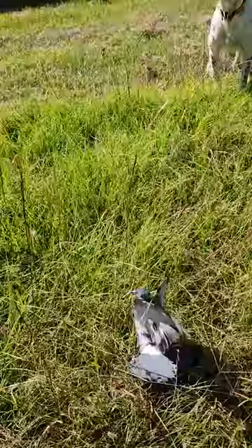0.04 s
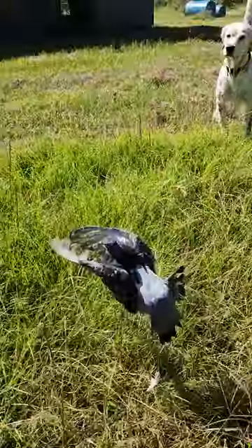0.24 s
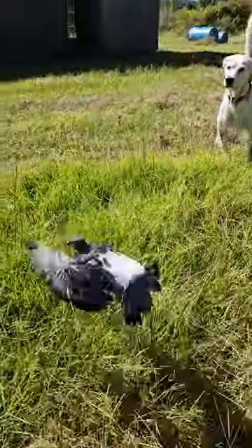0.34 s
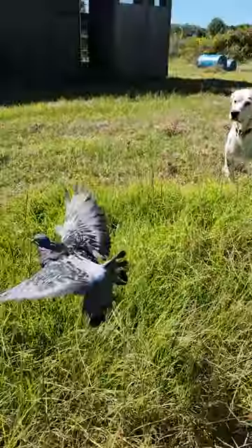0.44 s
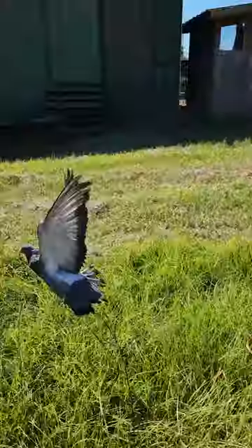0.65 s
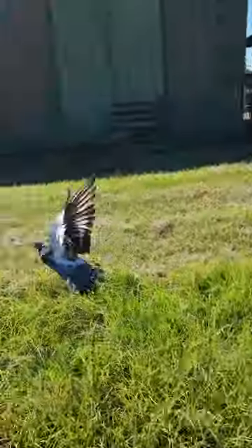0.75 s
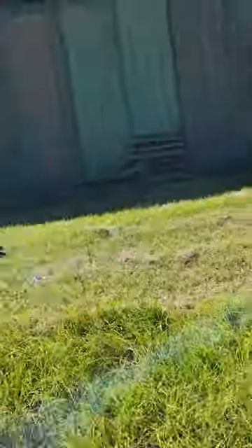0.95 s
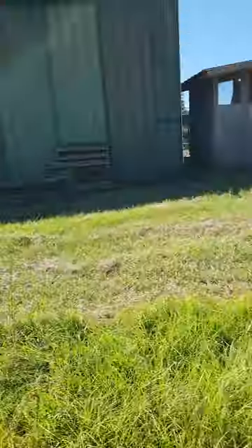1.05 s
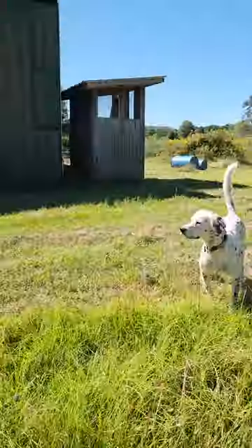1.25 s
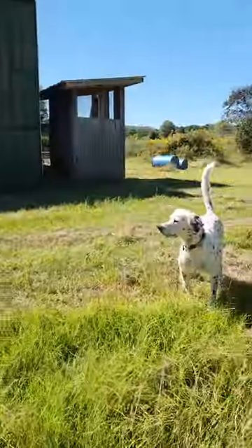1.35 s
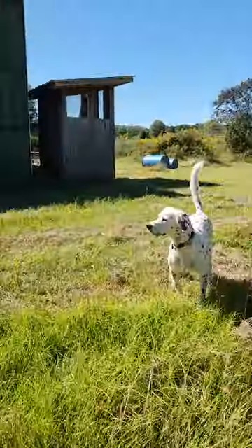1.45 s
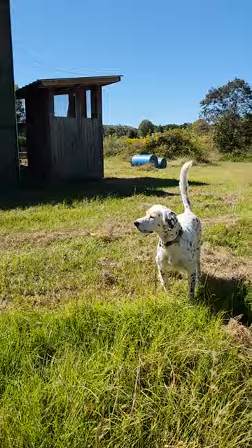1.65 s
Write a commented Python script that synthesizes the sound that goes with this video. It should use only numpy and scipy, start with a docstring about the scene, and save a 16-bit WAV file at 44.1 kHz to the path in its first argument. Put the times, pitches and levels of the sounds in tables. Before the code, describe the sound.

Fast bird wings clap and flap up from rustling grass, fading across an open field.

```python
"""A pigeon bursts out of long grass in an open field and flies off, about nine wingbeats a second.
Its wings thrash the stalks, then clap together at the top of each stroke. The feathers swish and
whistle through the air, and every beat pushes a soft puff of it. The claps die away first, leaving
mostly puffs. Behind the bird are crickets, a briefly ticking bush-cricket and a light breeze."""
import sys
import numpy as np
from scipy import signal
from scipy.fft import rfft, irfft
from scipy.io import wavfile
from scipy.ndimage import uniform_filter1d

SR = 44100
rng = np.random.default_rng(int(sys.argv[2]) if len(sys.argv) > 2 else 0)


def pcm_store(signal):
    """Save signal as 16-bit PCM."""
    levels = np.round(np.clip(np.atleast_2d(signal), -1, 1) * 32767)
    wavfile.write(sys.argv[1], SR, levels.astype(np.int16).T)


N = 74970
TIME = np.arange(N) / SR
FREQS = np.maximum(np.fft.rfftfreq(N, 1 / SR), 1)

# The wingbeats. Each row: time in seconds, puff level in dB, puff width in ms, then the levels in dB of
# the rebound, the upstroke whoosh, the swish and the whistle, and last the pan (left minus right) in dB.
WINGBEATS = [(.3275, -36, 1.9, -49, -38, -54, -37.5, 3.5), (.4600, -19.5, 2.7, -57, -33.5, -33.5, -40, 0),
             (.5730, -28.5, 1.7, -57, -38.5, -40, -42.5, -1.5),
             (0.6866, -26, 3.4, -41, -44, -40, -44.5, 0.5), (0.803, -18, 1.68, -55, -48, -41.5, -45, 1),
             (.9180, -21.5, 2.2, -46, -40.5, -43, -40.5, 1.5), (1.0345, -22, 3, -41, -48.5, -46, -46.5, 2),
             (1.148, -23, 4.1, -40, -46.5, -45, -46.5, 3.5), (1.261, -23, 4, -26, -49.5, -45, -52, 2.5),
             (1.3760, -24, 3.96, -31.5, -51, -50.5, -54, 3),
             (1.4850, -27.5, 3.46, -31.5, -54.5, -53.5, -61, 2.5),
             (1.5915, -28, 3.7, -35, -57, -54, -60, 3.5), (1.6980, -30, 4, -41, -60.5, -59, -60, 3)]
# How alike left and right are for close sounds. Each row: frequency in Hz, likeness (1 is identical).
NEAR_LIKENESS = [(60, 0.9), (300, .96), (700, 0.28), (1500, 0.23), (3000, 0.4), (5500, 0.1), (10000, 0.017)]


def from_db(db):
    """Turn decibels into a gain to multiply by."""
    return 10 ** (np.asarray(db) / 20)


def rms_one(x):
    """Scale a signal so that its average power is 1."""
    return x / np.sqrt(np.mean(x ** 2) + 1e-20)


def by_hz(points):
    """Join (Hz, value) points into a curve over all frequencies, giving each octave equal room."""
    hz, value = np.transpose(points)
    return np.interp(np.log(FREQS), np.log(hz), value)


def level(points):
    """Join (seconds, dB) points into a gain that changes over time."""
    return from_db(np.interp(TIME, *np.transpose(points)))


def bell(x, width):
    """A smooth hump of height 1, centred where x is zero."""
    return np.exp(-.5 * (x / width) ** 2)


def band(hz, octaves):
    """A smooth hump over the frequencies around one pitch."""
    return bell(np.log2(FREQS / hz), octaves)


def panned(db):
    """Left and right gains, with the left louder by this many dB."""
    return from_db(np.array([[db], [-db]]) / 2)


def noise(gain, likeness=NEAR_LIKENESS):
    """Stereo noise with a gain for each frequency and a chosen likeness of left and right."""
    alike = np.clip(by_hz(likeness), -1, 1)
    mid, side = rfft(rng.standard_normal((2, N)))
    spectrum = np.sqrt(1 + alike) * mid + np.sqrt(1 - alike) * side * [[1], [-1]]
    return rms_one(irfft(gain * spectrum, N))


def coloured(colour, likeness=NEAR_LIKENESS):
    """Stereo noise whose colour (its mix of low and high) follows (Hz, dB) points."""
    return noise(from_db(by_hz(colour)), likeness)


def drift(rate_hz):
    """A random wobble of typical size 1; a higher rate makes it quicker."""
    return rms_one(irfft(rfft(rng.standard_normal(N)) * bell(FREQS, rate_hz), N))


def burst(ms, hold_ms, release_ms):
    """A loudness shape that jumps up, holds, then dies away."""
    attack = bell(np.minimum(ms, 0), width=.2)
    return attack * np.exp(-np.maximum(ms - hold_ms, 0) / release_ms)


def steadied(x, envelope):
    """Give noise a loudness shape (an envelope), so that its total energy is not left to chance."""
    energy = np.sum(np.mean(x ** 2, axis=0) * envelope ** 2)
    return x * envelope * np.sqrt(np.sum(envelope ** 2) / (energy + 1e-20))


def evened(x, gain):
    """Smooth out the chance peaks in a burst's spectrum and colour it, keeping its energy."""
    spectrum = rfft(x)
    power = np.mean(np.abs(spectrum) ** 2, axis=0)
    outline = np.sqrt(np.abs(uniform_filter1d(power, size=900)) + 1e-12)
    return rms_one(irfft(spectrum / outline * gain, N)) * np.sqrt(np.mean(x ** 2))


def breathy(hz, envelope, spread_hz):
    """An airy tone: a narrow band of noise around a moving pitch."""
    phase = 2 * np.pi * np.cumsum(hz) / SR
    tone = drift(spread_hz) * np.sin(phase) + drift(spread_hz) * np.cos(phase)
    return steadied(tone[None], envelope)


def breeze_and_insects():
    """A distant hiss of breeze, a thin chorus of crickets and one bush-cricket ticking at the start."""
    # The colour of the open field. Each row: frequency in Hz, level in dB.
    field_colour = [(100, 4), (250, -30.5), (450, -4.5), (620, 6.5), (900, -1), (1200, -6.5), (1600, -4),
                    (3000, -6.5), (6000, -26), (8000, -54), (10000, -23), (15500, -4.5)]
    # How alike left and right are for far sounds. Each row: frequency in Hz, likeness (1 is identical).
    far_likeness = [(100, 0.47), (500, 0.57), (1500, 0.067), (8000, 0.04)]
    hiss = coloured(field_colour, far_likeness)
    chorus = noise(band(hz=7800, octaves=0.09), far_likeness)
    rasp = noise(band(hz=13700, octaves=0.13), far_likeness)
    tick_times = np.arange(0.0093, .145, step=0.016)
    ticks = sum(bell(TIME - at, width=0.00078) for at in tick_times)
    return from_db(-53.5) * hiss + from_db(-57.5) * chorus + from_db(-48) * ticks * rasp


def downwash():
    """Air pushed down by the wings buffets the microphone and swirls while the bird is close."""
    # The strength of the buffeting. Each row: time in seconds, level in dB.
    buffet_levels = [(0, -57), (.17, -48.5), (.25, -44.5), (.42, -35.5), (.55, -39), (.66, -43.5),
                     (.8, -43), (1.2, -45), (1.7, -53.5)]
    # The deep rumble of the buffeting. Each row: frequency in Hz, level in dB.
    buffet_colour = [(18, 0), (40, 4), (80, 0.5), (150, -15.5), (300, -33.5), (600, -47), (2000, -80)]
    # The low rush of swirling air. Each row: frequency in Hz, level in dB.
    swirl_colour = [(90, -3.5), (170, -5), (330, -3.5), (500, -16), (900, -20), (3000, -59)]
    closeness = bell(TIME - 0.56, width=0.17)
    swirls = from_db(-41.5) * closeness * coloured(swirl_colour)
    return level(buffet_levels) * coloured(buffet_colour) + swirls


def thrashed_grass():
    """Wings and feet beat the grass into many tiny crackles, which settle once the bird is clear."""
    # How hard the grass is thrashed. Each row: time in seconds, level in dB.
    thrash_levels = [(0, -62.5), (.14, -58.5), (.17, -42.5), (.192, -46), (.222, -33), (.242, -26),
                     (.258, -22), (.272, -35), (.292, -46), (.312, -37.5), (.348, -48), (.366, -35),
                     (.377, -24), (.40, -31.5), (.437, -43), (.47, -43.5), (.54, -46.5), (.68, -51)]
    # The colour of rustling grass. Each row: frequency in Hz, level in dB.
    grass_colour = [(100, -18.5), (330, 5.5), (480, -4), (700, -0.5), (1500, -7), (2600, -11), (5000, -7.5),
                    (7500, -6.5), (10000, -10.5), (15000, -17.5)]
    grains_per_s, grain_s, steady_hiss = 700, 0.00067, .5
    clear_at_s, settle_db_per_s = 0.95, 60
    sizes = from_db(3 * np.minimum(rng.exponential(1, N), 3))
    grains = sizes * (rng.random(N) < grains_per_s / SR)
    decay = np.exp(-1 / (grain_s * SR))
    fading_grains = signal.lfilter([1], [1, -decay], grains)
    crackle = rms_one(steady_hiss + rms_one(fading_grains))
    settling = from_db(-settle_db_per_s * np.maximum(TIME - clear_at_s, 0))
    return level(thrash_levels) * settling * crackle * coloured(grass_colour)


def snapping_stalks():
    """Single stalks snap or are slapped, each with a very short burst of noise."""
    # The snaps. Each row: start in seconds, level in dB, pan (left minus right) in dB.
    snaps = [(0.1985, -21, 1), (0.2134, -17.5, -5), (0.233, -15.5, 2.5), (0.302, -36, 0), (.3110, -37, -4),
             (.3575, -21.5, 3), (0.3717, -21, 6.5), (0.3889, -17, 0.5), (0.4742, -30, 8),
             (0.6407, -21.5, -2), (0.7397, -25.5, 1.5)]
    # The colour of a snapping stalk. Each row: frequency in Hz, level in dB.
    snap_colour = [(150, -3), (700, -1.5), (1400, 4), (2600, -2.5), (5000, -3), (8000, -3.5), (10000, -9.5),
                   (15000, -11)]
    stalk = coloured(snap_colour)
    out = np.zeros((2, N))
    for start, db, pan_db in snaps:
        envelope = burst((TIME - start) * 1000, hold_ms=0, release_ms=1.7)
        out += from_db(db) * panned(pan_db) * steadied(stalk, envelope)
    return out


def feathers_in_air():
    """Feathers cut the air with a fluttering swish, a low whoosh going up and a whistle coming down."""
    # The colour of the swish. Each row: frequency in Hz, level in dB.
    swish_colour = [(150, 2.5), (350, -3), (600, -1), (1000, -2), (1500, 0), (2200, -7.5), (4500, -8.5),
                    (8000, -13.5), (10000, -22), (15000, -18.5)]
    upstroke_lead_s, fastest_at_s = .02, .038  # before and after the top of the stroke
    rise_hz_per_s, sag_hz_per_s = 160, 3300  # the whoosh is higher with each beat, and falls within it
    swish_envelope, tones = np.zeros((2, 2, N))
    for at, _, _, _, whoosh_db, swish_db, whistle_db, pan_db in WINGBEATS:
        t = TIME - at
        upstroke = bell(t + upstroke_lead_s, width=0.01)
        downstroke = bell(t - fastest_at_s, width=0.022)
        swish_envelope += panned(pan_db) * from_db(swish_db) * (downstroke + from_db(-2) * upstroke)
        whoosh_hz = 248.6 + rise_hz_per_s * at - sag_hz_per_s * (t + upstroke_lead_s)
        whoosh = breathy(whoosh_hz, upstroke, spread_hz=120)
        wing_speed = bell(t - fastest_at_s, width=.055)
        whistle_hz = 914 * wing_speed
        swell = bell(t - 0.044, width=0.011)
        whistle = breathy(whistle_hz, swell, spread_hz=115)
        whistle += from_db(-14) * breathy(1.9 * whistle_hz, swell, spread_hz=180)
        tones += panned(pan_db) * (from_db(whoosh_db) * whoosh + from_db(whistle_db) * whistle)
    flutter = rms_one(from_db(3.5 * drift(rate_hz=44)))
    return swish_envelope * flutter * coloured(swish_colour) + tones


def wing_tip_brushes():
    """The wing tips brush faintly at the top of every stroke."""
    swells = sum(bell(TIME - at, width=0.013) for at, *_ in WINGBEATS)
    return from_db(-57) * swells * noise(band(hz=4560, octaves=0.72))


def wing_claps():
    """The wings meet: a sharp crack, a crush of feathers, a hollow thump and scatter off the grass."""
    # The claps. Each row: start in seconds, feather level in dB, hold in ms, bright pitch in Hz,
    # knock pitch in Hz, knock boost in dB, crack level in dB, crack delay in ms, thump level in dB,
    # pan (left minus right) in dB.
    claps = [(0.3256, -16, 3.9, 3880, 1400, 6, -1, 1.91, -20.5, -2),
             (0.4519, -24, 3.3, 3060, 1500, 7.5, -20, 0.59, -26, -1),
             (.4614, -11.5, 1.05, 2600, 1340, 5, -5, 0.435, -31, 1),
             (.5693, -22.5, 3.9, 5740, 2700, 14.5, -6.5, 0.308, -21, 1),
             (0.6849, -13.5, 3.84, 4540, 2430, 9, -3, 0.89, -12, 0.5),
             (0.7991, -15, 1.9, 4740, 1930, 2.5, -2.5, 0.16, -15, 1),
             (0.915, -13.5, 0.73, 4700, 1210, 9.5, 1, 0.17, -19.5, -1),
             (1.0321, -25.5, 1.4, 5560, 2060, 6, -8.5, 0.13, -23.5, 1),
             (1.1448, -20.5, 0.5, 6940, 1220, 7.5, -17, 0.62, -25, 0),
             (1.259, -27, 0.9, 5900, 1900, 8, -10, 0.13, -29, 0.5)]
    # The colour of crushed feathers. Each row: frequency in Hz, level in dB.
    crush_colour = [(200, 1.5), (450, -7.5), (750, -5), (1100, -5), (1900, -0.5), (2600, -10.5), (3500, -4),
                    (6000, -8.5), (7700, -4.5), (9500, -13), (15000, -11)]
    thump_hz, thump_ms, crack_ms = 310, 3.15, 0.06
    dull_hz, dull_db_per_octave = 3230, 4  # claps pitched below this lose treble
    treble_loss_db = dull_db_per_octave * np.clip(np.log2(FREQS / dull_hz), 0, 1)
    out = np.zeros((2, N))
    for start, db, hold_ms, bright_hz, knock_hz, knock_db, crack_db, delay_ms, thump_db, pan_db in claps:
        t = TIME - start
        ms = t * 1000
        resonances_db = 9 * band(bright_hz, octaves=0.36) + knock_db * band(knock_hz, octaves=0.22)
        colour_db = by_hz(crush_colour) + resonances_db - (bright_hz < dull_hz) * treble_loss_db
        crush = burst(ms, hold_ms, release_ms=1.56)
        scatter = from_db(-15.5) * burst(ms, hold_ms, release_ms=8.1)
        feathers = evened(steadied(noise(1), crush + scatter), from_db(colour_db))
        edge = (ms - delay_ms) / crack_ms
        crack = (edge - 0.33) * bell(edge, 0.67)  # one lopsided swing of pressure
        thump = np.sin(2 * np.pi * thump_hz * t) * (ms > 0) * np.exp(-np.maximum(ms, 0) / thump_ms)
        clap = from_db(db) * feathers + from_db(crack_db) * crack + from_db(thump_db) * thump
        out += panned(pan_db) * clap
    return out


def air_puffs():
    """Each beat sucks, pushes and sucks the air, then rebounds more softly as the wings sweep down."""
    rebound_delay_s, rebound_ms, low_cut_hz = 0.0194, 4.2, 35
    push_width, suction_width = 0.64, 2.06  # as multiples of the puff's width
    out = np.zeros(N)
    for at, puff_db, puff_ms, rebound_db, *_ in WINGBEATS:
        puff, rebound = (at, puff_db, puff_ms), (at + rebound_delay_s, rebound_db, rebound_ms)
        for centre, db, width_ms in (puff, rebound):
            offset = (TIME - centre) * 1000 / width_ms
            push = bell(offset, push_width) / push_width
            suction = bell(offset, suction_width) / 2
            out += from_db(db) * (push - suction)
    return signal.sosfilt(signal.butter(1, low_cut_hz, "high", fs=SR, output="sos"), out)


def scene():
    """The field, the moving air, the grass and the wings, added together."""
    grass = thrashed_grass() + snapping_stalks()
    wings = feathers_in_air() + wing_tip_brushes() + wing_claps() + air_puffs()
    return breeze_and_insects() + downwash() + grass + wings


def record(dry):
    """Clip any peaks that come near full scale, then cut the very highest treble."""
    cutoff_hz = 15900
    low_pass = signal.ellip(10, .1, 80, cutoff_hz, fs=SR, output="sos")
    return signal.sosfilt(low_pass, np.clip(dry, -.85, .85))


dry = scene()
out = record(dry)
pcm_store(out)
```